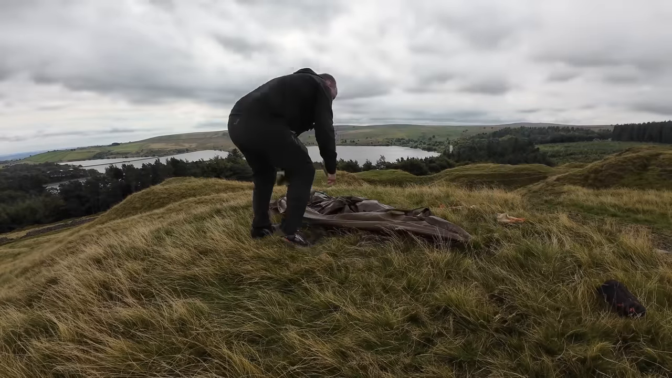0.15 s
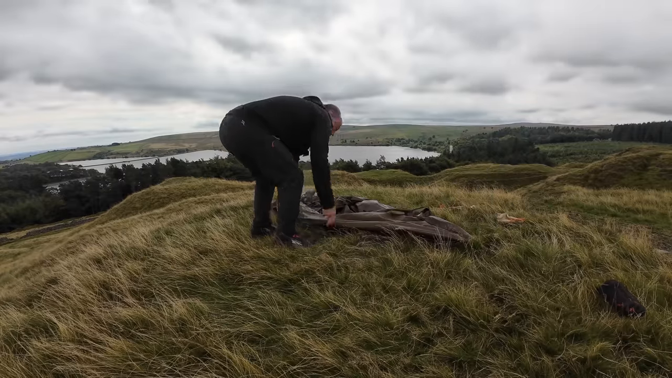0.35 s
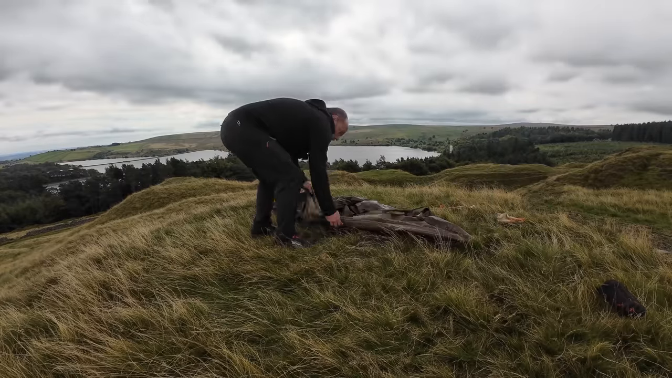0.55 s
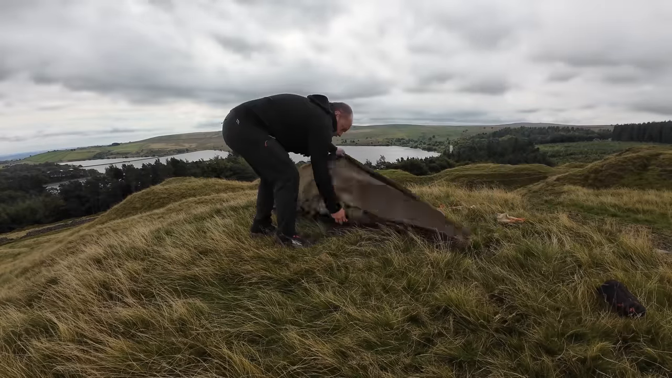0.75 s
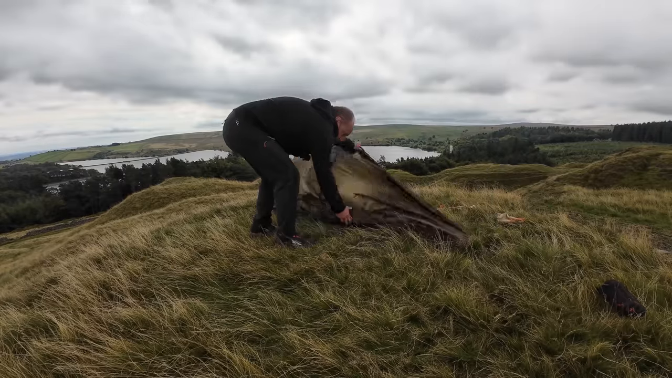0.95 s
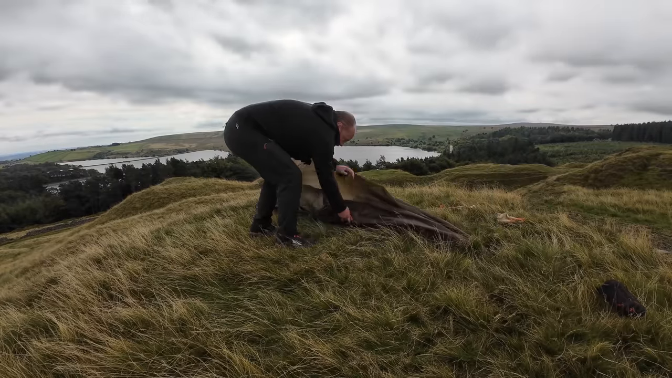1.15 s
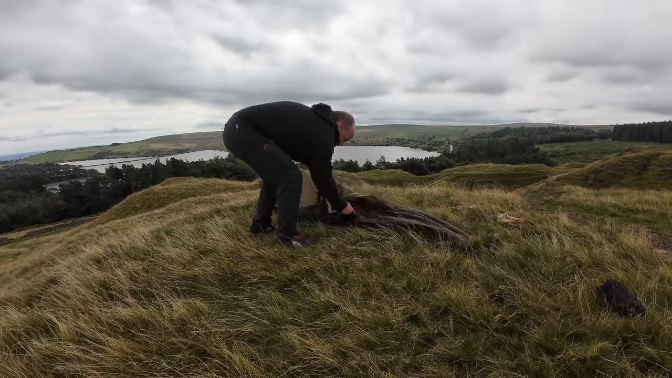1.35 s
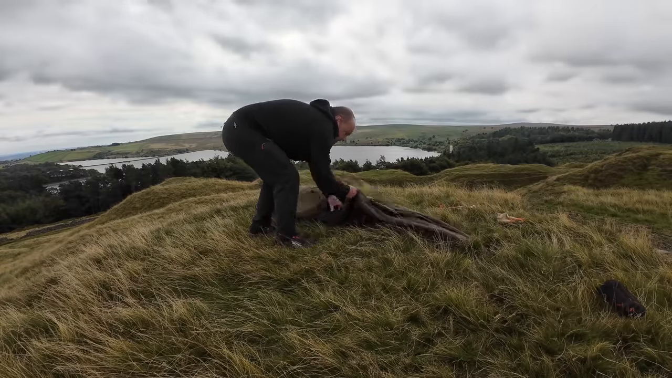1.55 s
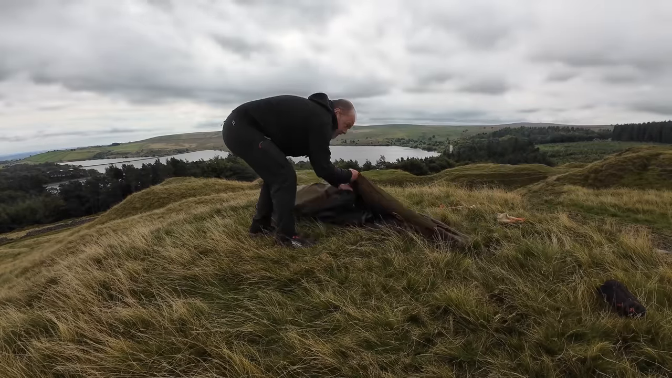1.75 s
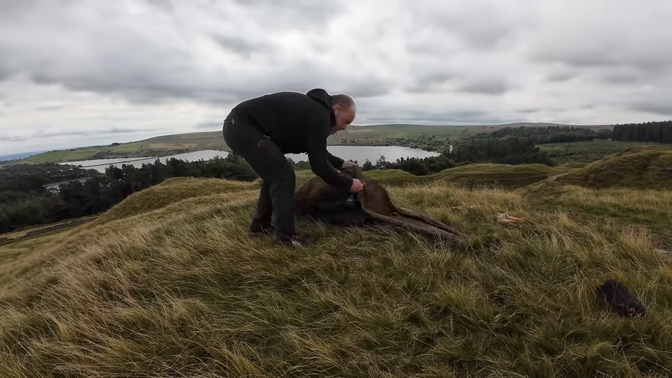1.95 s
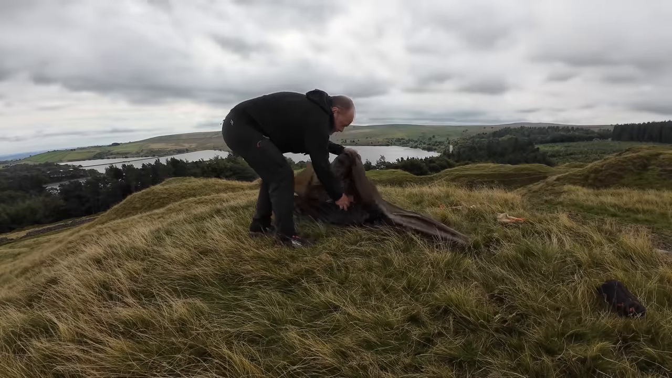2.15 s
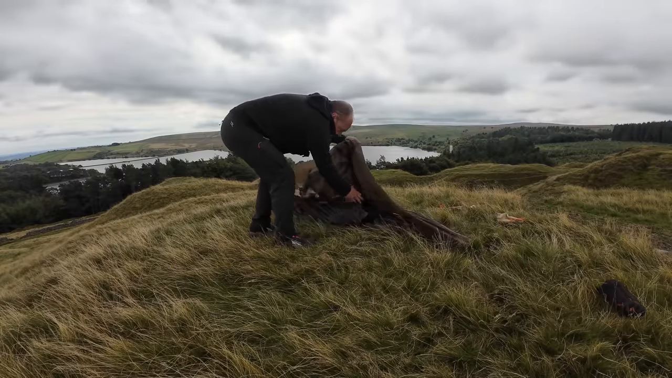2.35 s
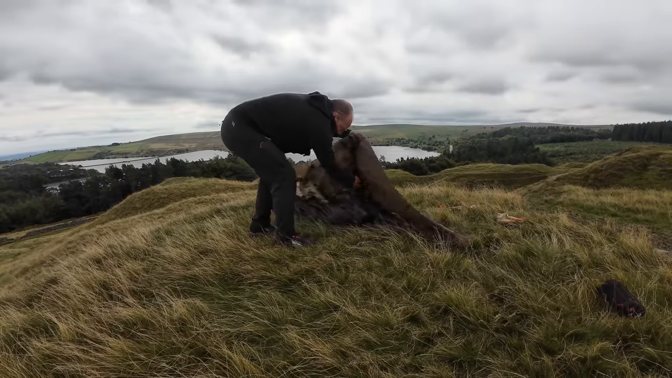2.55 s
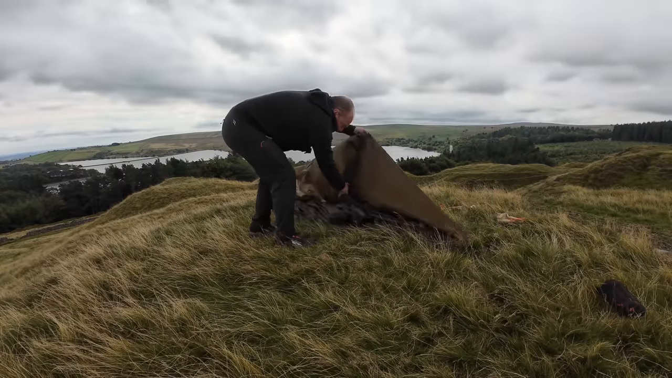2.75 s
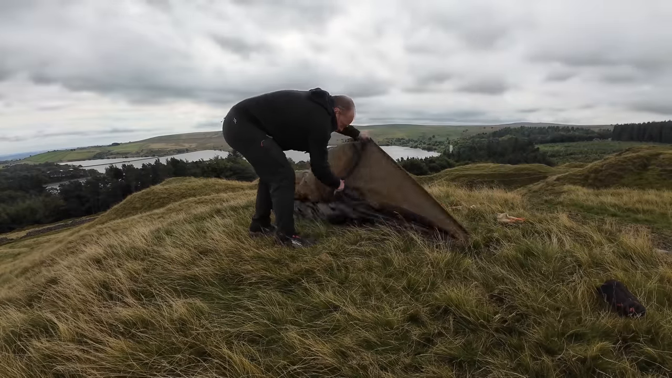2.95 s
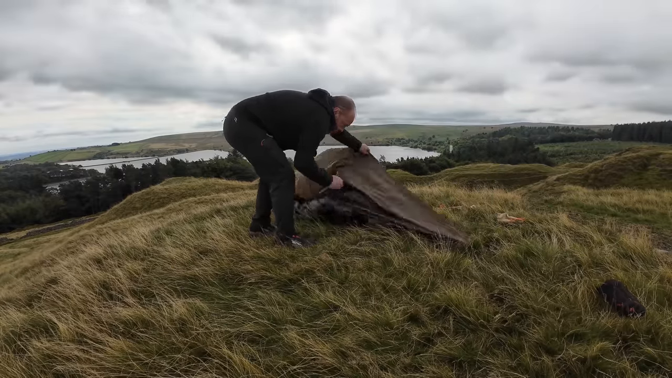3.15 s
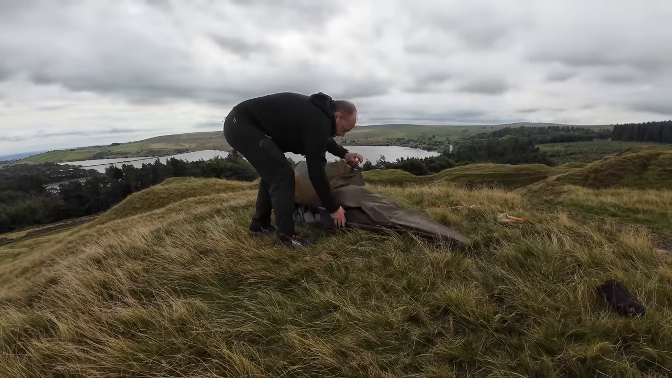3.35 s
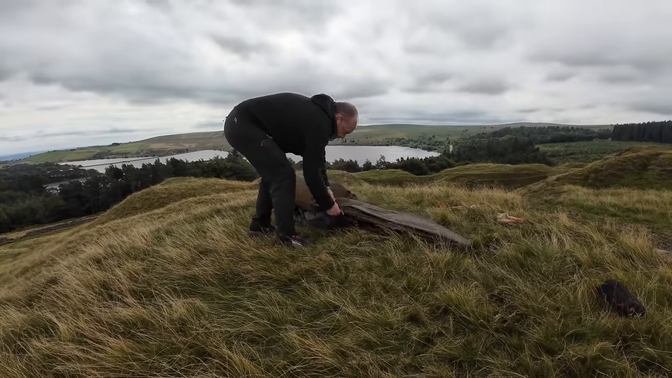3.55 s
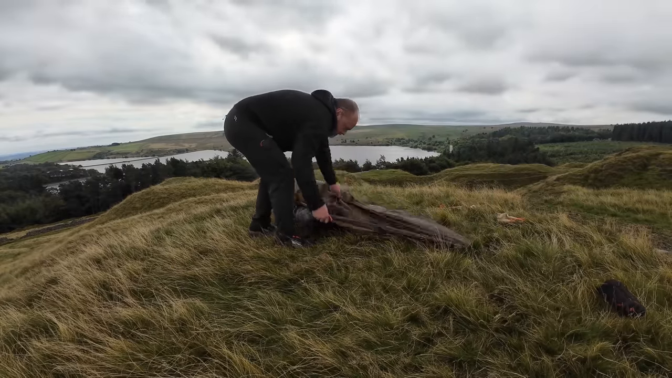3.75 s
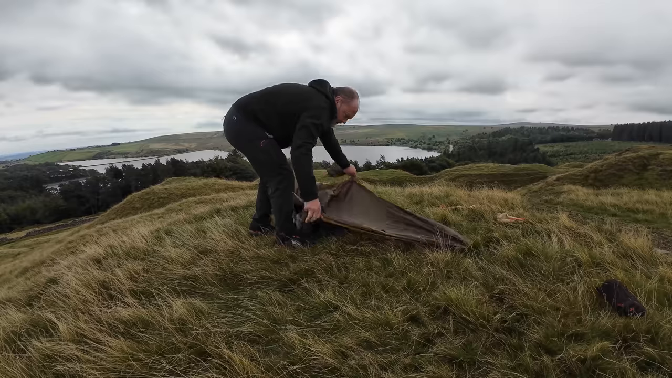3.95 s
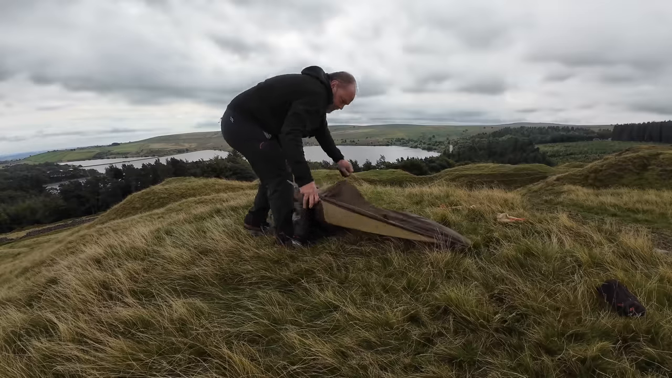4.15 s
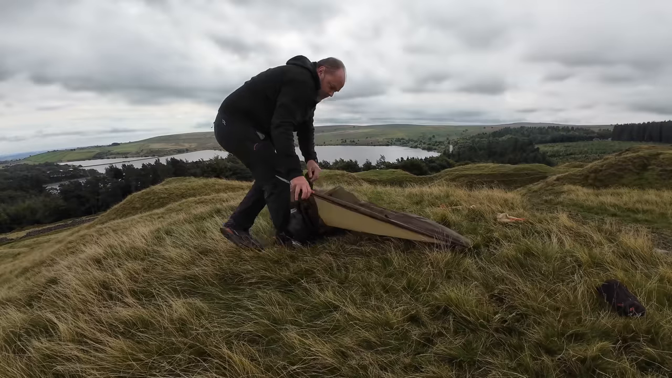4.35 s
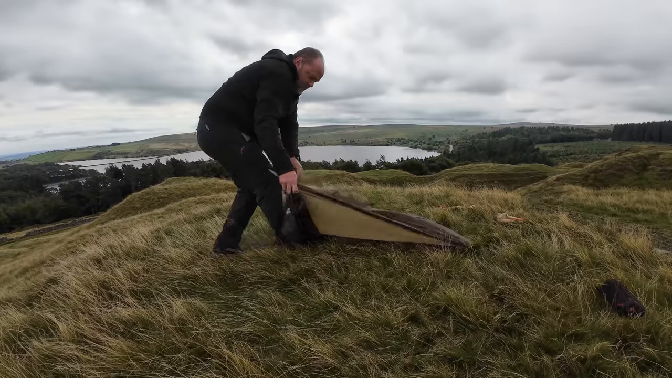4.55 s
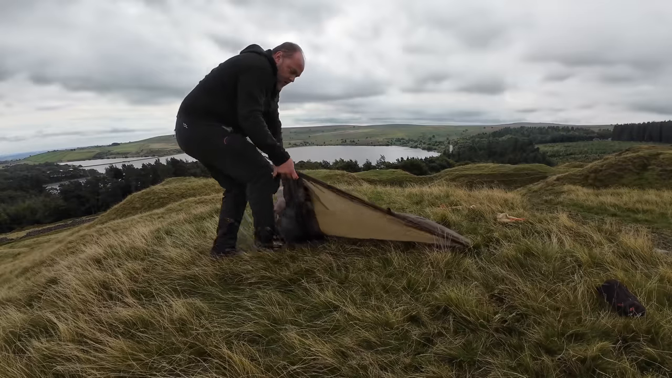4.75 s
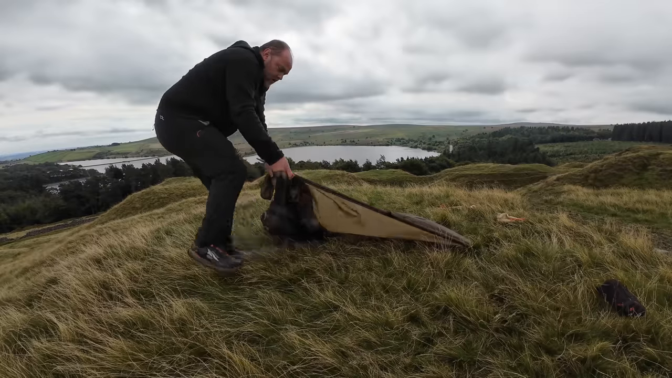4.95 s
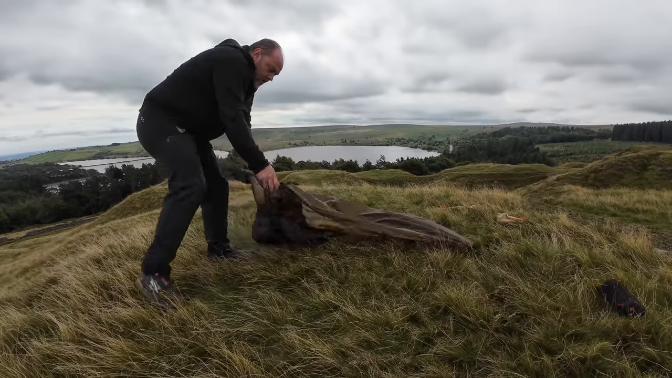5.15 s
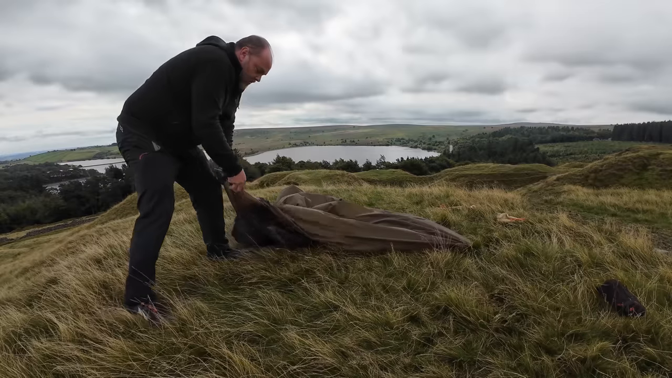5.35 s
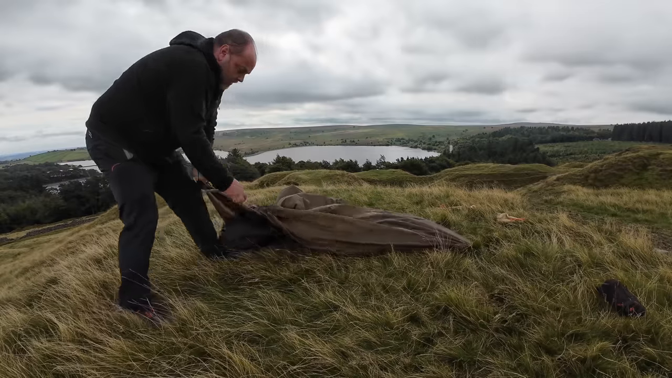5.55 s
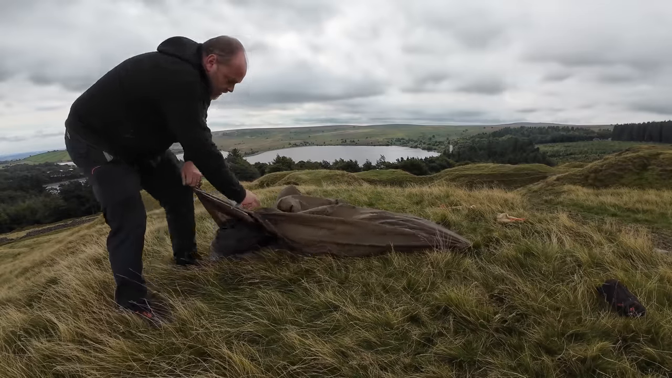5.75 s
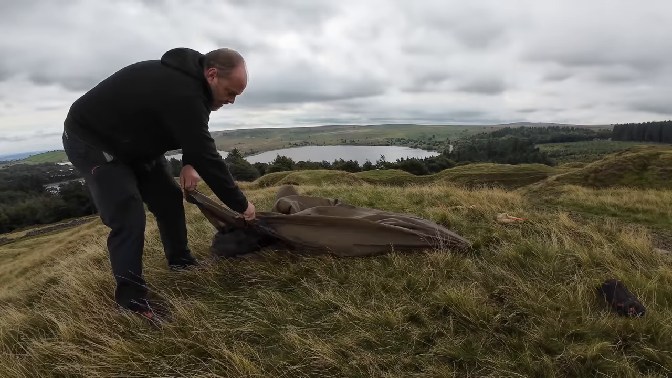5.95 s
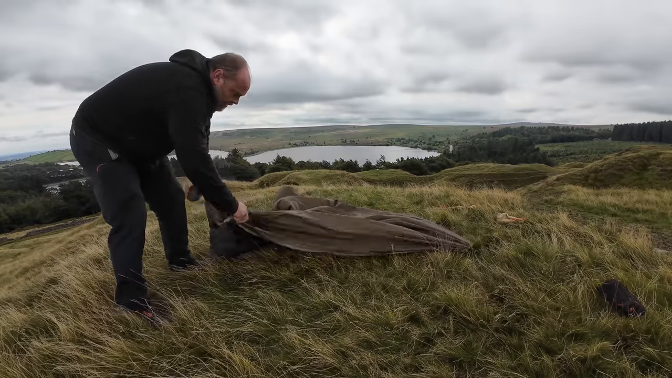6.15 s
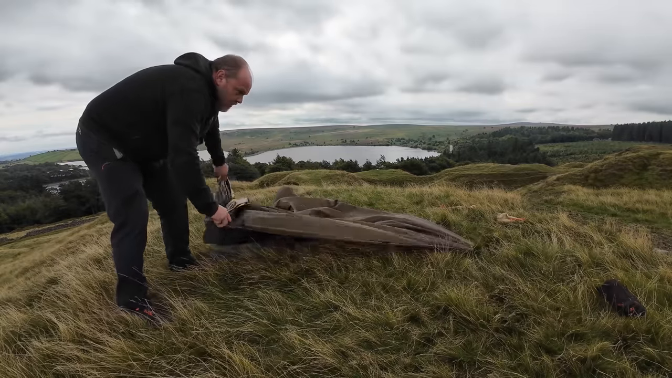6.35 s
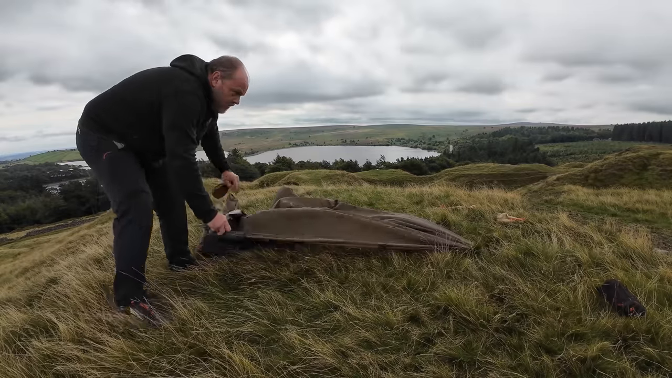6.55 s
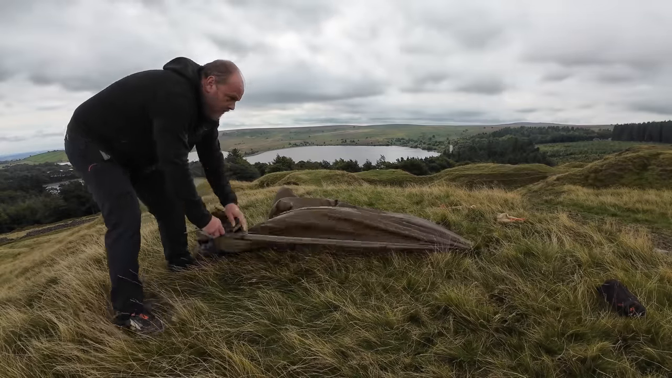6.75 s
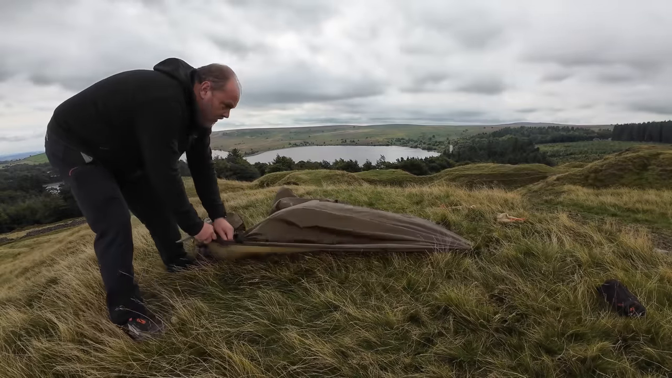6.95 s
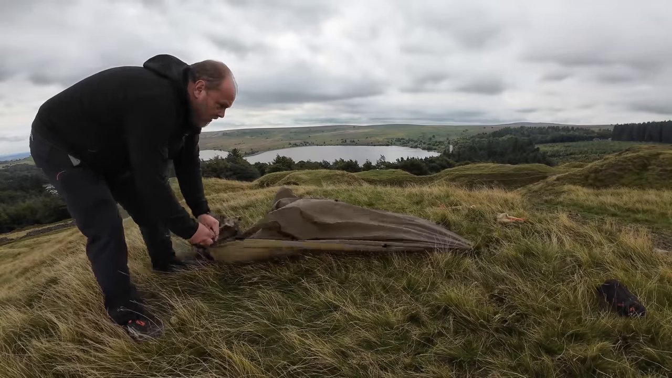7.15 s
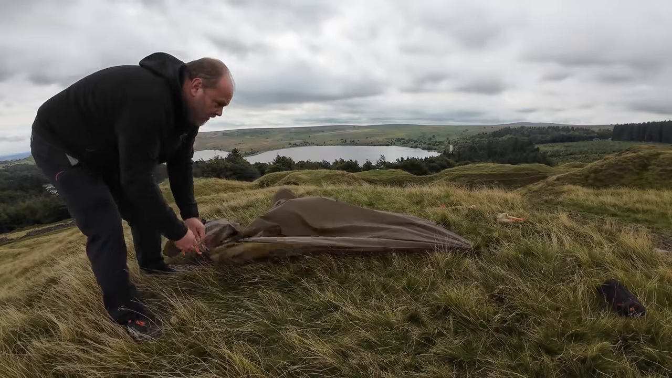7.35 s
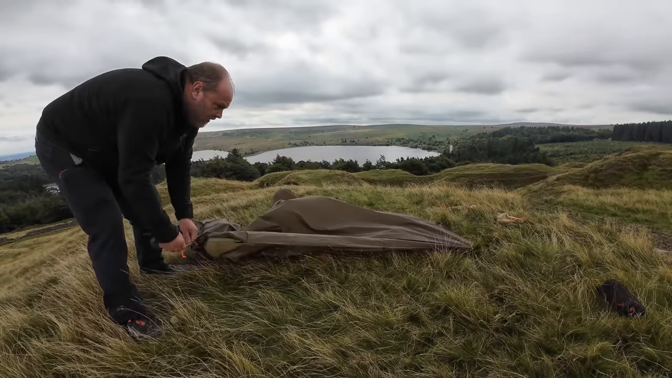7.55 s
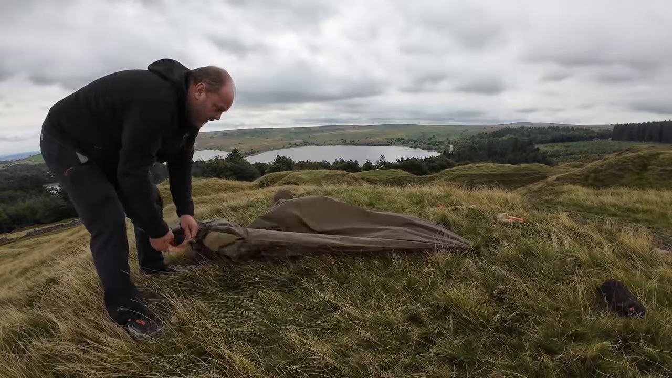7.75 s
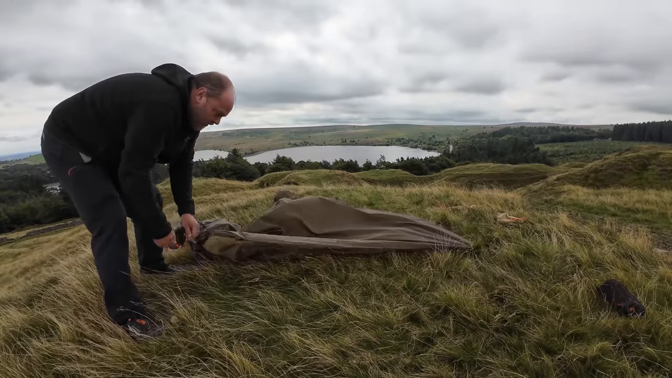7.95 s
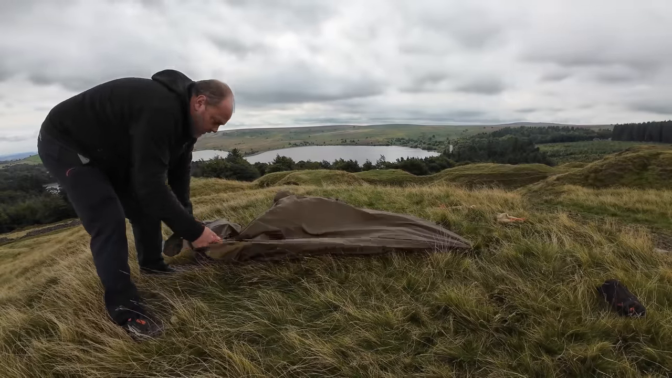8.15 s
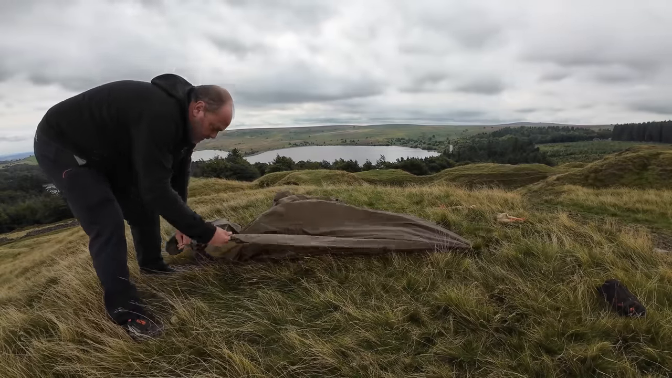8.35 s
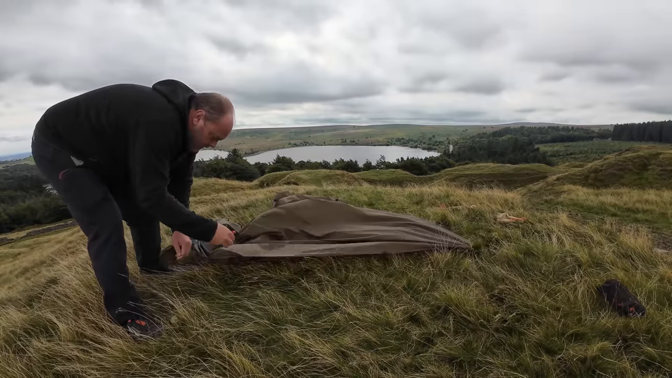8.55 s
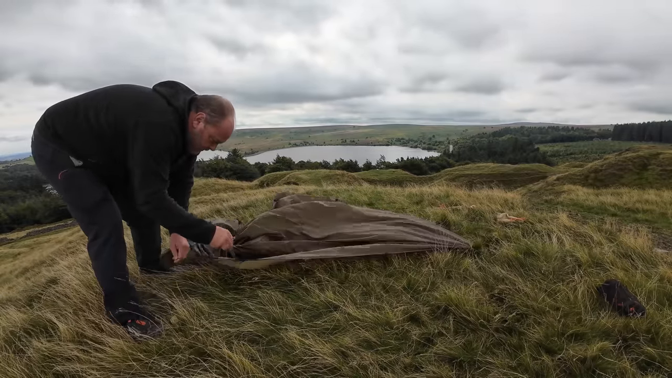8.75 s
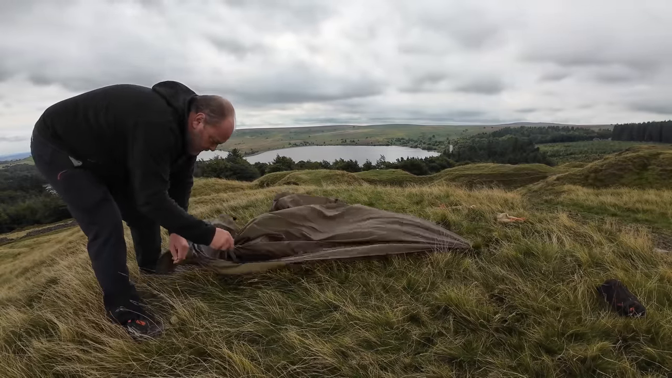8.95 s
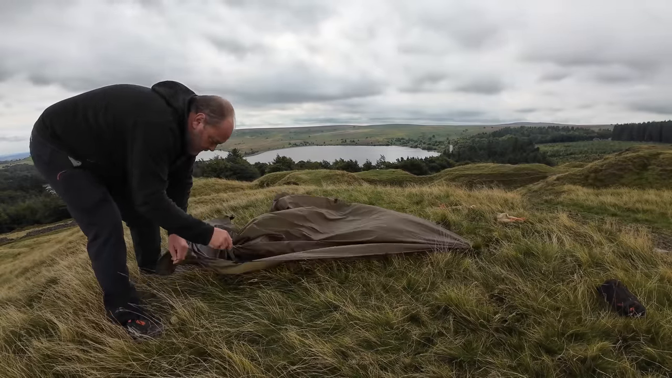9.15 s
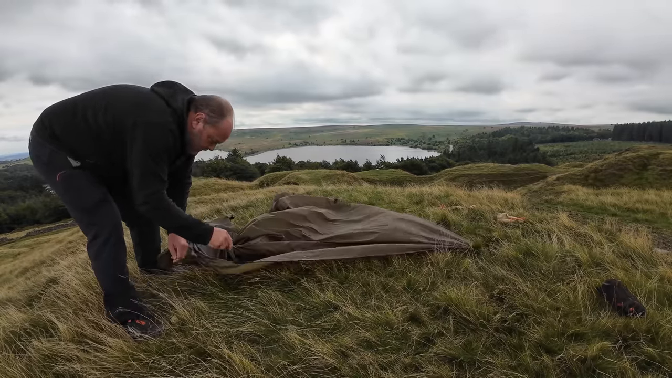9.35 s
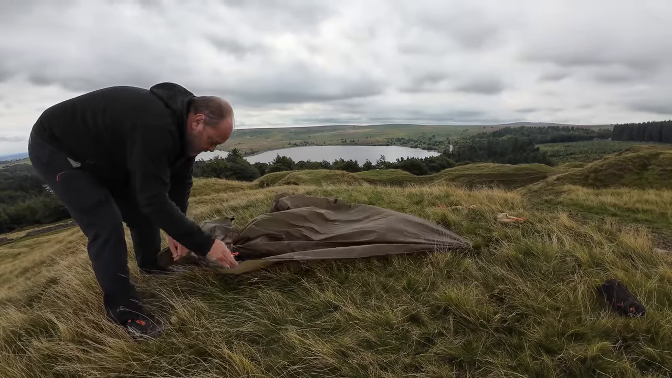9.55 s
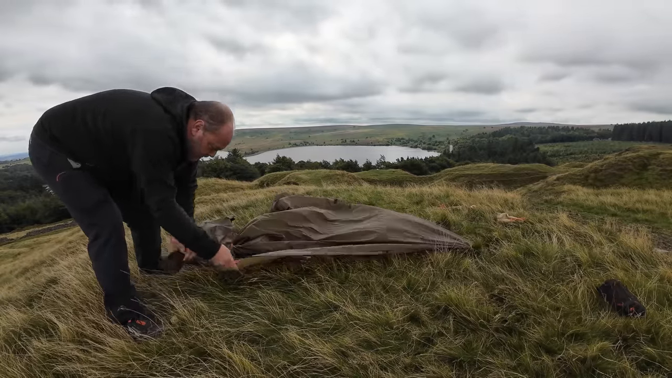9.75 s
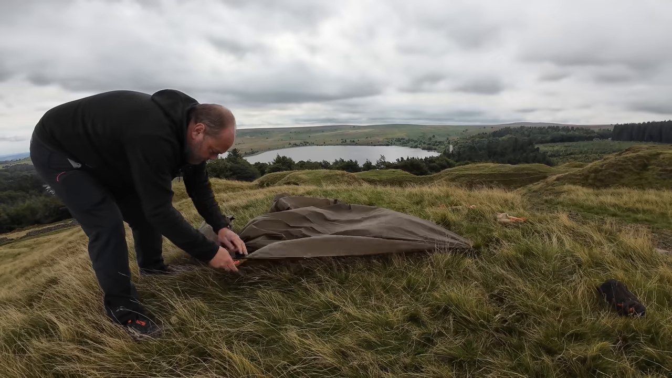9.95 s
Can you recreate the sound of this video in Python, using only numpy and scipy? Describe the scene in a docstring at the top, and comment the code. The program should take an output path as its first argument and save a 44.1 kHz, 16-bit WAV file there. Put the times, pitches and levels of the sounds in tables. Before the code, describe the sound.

A stiff nylon tarp is lifted, shaken out and dragged over long grass, rasping and crinkling with sharp crease pops and a few taut snaps. The handling is loudest in the first four seconds, swells once more, then fades to faint stirring. Near the end, metal pegs clink in a hand in two short clusters. Light gusts rumble unevenly on the microphone throughout, in dry open air.

```python
"""A stiff nylon tarp rustles as it is lifted, shaken out and dragged over long grass on a breezy hill.
The sliding weave rasps, wrinkles buckle in tiny ticks, large creases pop and panels snap taut.
Light gusts rumble on the microphone throughout.
Near the end metal pegs touch and ring in the hand, damped by the grip."""
import sys
import numpy as np
from scipy import signal
from scipy.io import wavfile

SR = 44100
rng = np.random.default_rng(int(sys.argv[2]) if len(sys.argv) > 2 else 0)


def unload_wav(signal):
    """Save mono or channel-first audio to the path in sys.argv[1] as 16-bit WAV at rate SR, clipped to [-1, 1]."""
    wavfile.write(
        sys.argv[1],
        SR,
        np.round(np.clip(np.atleast_2d(signal).T, -1, 1) * 32767).astype(np.int16),
    )


N = 441000
TIME = np.arange(N) / SR
BILLOW_HZ, RASP_LOW_HZ, RASP_HIGH_HZ, HISS_HZ = 550, 1500, 3580, 6800   # cloth crossfade corners


def from_db(db):
    """Decibels to gain."""
    return 10 ** (np.asarray(db) / 20)


def rms_one(x):
    """Scale to unit rms."""
    return x / np.sqrt(np.mean(x ** 2) + 1e-20)


def peak_one(x):
    """Scale to unit peak."""
    return x / np.abs(x).max()


def in_time(rows):
    """Interpolate (seconds, values..) rows to every sample."""
    times_s, *columns = np.transpose(rows)
    return [np.interp(TIME, np.sort(times_s), column) for column in columns]


def at_hz(points, hz):
    """Read a spectrum on a log-frequency axis."""
    points_hz, values = np.transpose(points)
    return np.interp(np.log(hz), np.log(points_hz), values)


def drift(rate_hz):
    """Unit-rms random wander, low-passed at rate_hz."""
    hop, warmup = 40, 2000
    pole = np.exp(-2 * np.pi * rate_hz * hop / SR)
    white = rng.standard_normal(N // hop + warmup + 2)
    slow = signal.lfilter([1], [1, -2 * pole, pole * pole], white)[warmup:]
    return np.interp(np.arange(N) / hop, np.arange(len(slow)), rms_one(slow))


def band(x, low_hz, high_hz):
    """Butterworth band-pass."""
    top_hz = min(high_hz, .48 * SR)
    edges_hz = [min(low_hz, top_hz / 2 ** (1 / 8)), top_hz]
    return signal.sosfilt(signal.butter(2, edges_hz, "band", fs=SR, output="sos"), x)


def ring(x, hz, t60_s):
    """One mode: a click in, a decaying sine out."""
    radius, angle = np.exp(-np.log(1000) / (t60_s * SR)), 2 * np.pi * hz / SR
    return signal.lfilter([0, np.sin(angle)], [1, -2 * radius * np.cos(angle), radius ** 2], x + 1e-18)


def add(out, start_s, sound):
    """Mix a short sound in at start_s."""
    start = int(start_s * SR)
    out[start:start + len(sound)] += sound[:N - start]


def noise_bands(low_hz, high_hz, count):
    """Adjacent noise bands, neighbours uncorrelated: (centre in Hz, signal) pairs."""
    edges_hz = np.geomspace(low_hz, high_hz, count + 1)
    white = rng.standard_normal((2, N))
    return [(np.sqrt(low * high), band(white[k % 2], low, high))
            for k, (low, high) in enumerate(zip(edges_hz, edges_hz[1:]))]


def pulling(stir_hiss_db=-4, release_db=-20, lead_share=0.62):
    """Strokes add in power to slack cloth stirring on grass. Returns billow, rasp, hiss in dB."""
    # Slack cloth. Each row: time in seconds, rasp in dB, billow in dB over the rasp.
    stirring = [(0, -77, 1), (.26, -77, 5), (.6, -59.5, 2), (2.1, -60, -3), (4.5, -61, -3.5),
                (5.3, -60.5, -2.5), (5.7, -66, 0.5), (6.55, -61.5, -3.5), (7.31, -68.5, 0.5),
                (7.41, -80, 1.5), (8.3, -77.5, 2), (9.05, -75.5, 2), (9.7, -79.5, 6.5)]
    # Pulls, shakes and drags. Each row: start, attack, hold and release in seconds, rasp in dB,
    # billow and hiss in dB over the rasp.
    strokes = [(0.017, 0.089, 0.039, .11, -58.5, -1, -4), (0.32, .095, .04, .2, -49, -8, -3),
               (0.355, .005, .11, .22, -49, -2, -7), (0.531, .1, .24, .11, -39.5, -2, -5),
               (0.86, .01, .025, .06, -42, 1, -9), (0.92, .03, 0.2, .35, -51.5, -2, -7.5),
               (1.1, 0.02, 0.038, .15, -53, -2, 4.5), (1.326, 0.044, 0.024, .2, -42, -3, -2.5),
               (1.446, 0.017, 0.028, .15, -48, -6, 2), (1.562, 0.016, 0.034, .15, -49, -6.5, 3.5),
               (1.623, 0.045, 0.28, .2, -54, -5, 2), (1.92, 0.032, 0.039, .08, -47.5, -5, 5),
               (2.215, 0.26, .1, .3, -54, -6, -3), (2.478, 0.037, 0.12, .15, -53, -6, 2),
               (2.606, 0.033, 0.052, .1, -45.5, -9, -0.5), (2.721, .015, 0.0075, .07, -42.5, -12, 2),
               (2.824, 0.021, 0.18, .2, -50.5, -7, -4), (2.969, 0.069, 0.024, .14, -40.5, -6, -2),
               (3.245, 0.069, 0.13, .2, -53.5, -8, -5), (3.503, 0.088, 0.084, .3, -43, -4, -2),
               (3.676, 0.059, .13, .18, -39, -1, 0), (4.033, 0.053, 0.27, .3, -60, -3.5, -1.5),
               (4.724, 0.044, 0.046, .12, -57.5, -3, -4), (4.92, 0.052, 0.095, .3, -54, -5.5, -2),
               (5.337, 0.14, 0.099, .06, -59.5, -4.5, -2), (5.776, 0.035, 0.028, .08, -59.5, -0.5, -6.5),
               (5.906, 0.014, 0.1, .1, -56.5, -4, -2), (6.028, 0.093, 0.1, .1, -41.5, -8, 0),
               (6.343, 0.056, 0.033, .15, -56.5, -3.5, -9), (6.887, .014, 0.015, .08, -60.5, 1.5, 2),
               (7.543, 0.03, .03, .08, -69.5, 4, 0), (7.819, 0.037, .09, .1, -72, 5, -2),
               (8.224, 0.019, .015, .06, -70, 0.5, -10), (8.586, 0.026, .03, .12, -73.5, 3, -8),
               (8.766, 0.057, 0.025, .06, -65.5, -4, -7), (9.32, 0.15, .05, .15, -75.5, 5.5, -4),
               (9.71, 0.081, 0.056, .2, -73, 7, -3), (9.915, 0.037, 0.037, .1, -64, -1, -3)]
    stir_db, stir_billow_db = in_time(stirring)
    power = from_db([stir_db + stir_billow_db, stir_db, stir_db + stir_hiss_db]) ** 2
    for start_s, attack_s, hold_s, release_s, rasp_db, billow_db, hiss_db in strokes:
        lead_in_s = max(start_s - attack_s, 0)
        span_s = 2 * attack_s + hold_s + 2 * release_s
        since_crest_s = TIME[:int(span_s * SR)] + lead_in_s - start_s - attack_s
        swell = np.exp(-(np.minimum(since_crest_s, 0) / (lead_share * attack_s)) ** 2)
        fade = from_db(release_db * np.maximum(since_crest_s - hold_s, 0) / release_s)
        for part, part_db in zip(power, (billow_db, 0, hiss_db)):
            add(part, lead_in_s, (from_db(rasp_db + part_db) * swell * fade) ** 2)
    return 10 * np.log10(power)


def faltering(levels_db, common_db=1.0, own_db=.6, rate_hz=14):
    """The cloth sticks and gives, as a whole and in its parts."""
    together_db = common_db * drift(rate_hz)
    return [part_db + together_db + own_db * drift(rate_hz) for part_db in levels_db]


def cloth_db(levels_db, hz):
    """Cloth level at one frequency: billow in the bass, fold rasp in the middle, weave hiss on top."""
    # Cloth colour. Each row: frequency in Hz, relative spectral density in dB.
    colour = [(130, -4), (220, 2), (320, 2.5), (480, 1), (660, -5), (880, -8.5), (1150, -7.5), (1480, -9.5),
              (2000, -5.5), (3300, -6.5), (4700, -11.5), (6800, -9.5), (11000, -13), (15000, -13)]
    billow_db, rasp_db, hiss_db = levels_db
    low = at_hz([(BILLOW_HZ, 1), (RASP_LOW_HZ, 0)], hz)
    high = at_hz([(RASP_HIGH_HZ, 0), (HISS_HZ, 1)], hz)
    return low * billow_db + (1 - low - high) * rasp_db + high * hiss_db + at_hz(colour, hz)


def sliding(levels_db, gain_db=14.0, catch_db=1.46, catch_hz=55, patchy_db=1.74, patchy_hz=7):
    """The weave rubs on itself and on grass, catching in all bands at once; shifting folds recolour it."""
    # Resonant pocket between folds. Each row: time in seconds, centre in Hz, strength in dB.
    pocket = [(0.1, 2600, -9), (0.38, 2360, 8), (0.7, 2250, 0.5), (1.33, 2100, 5.5), (1.48, 2900, -2.5),
              (1.62, 3780, 8.5), (1.97, 3870, 13), (2.15, 3300, -2), (2.93, 2500, -.5), (3.06, 2700, 10),
              (3.25, 2670, -1), (3.6, 3130, 5.5), (3.85, 3080, 3), (4.7, 3650, 5.5), (6.15, 2880, 5),
              (6.7, 2706, 0), (9.9, 2703, -1)]
    pocket_hz, pocket_db = in_time(pocket)
    width_octaves = 0.335 * from_db(-0.74 * pocket_db)   # stronger is narrower
    catching_db = catch_db * drift(catch_hz)
    out = 0
    for hz, noise in noise_bands(150, 17000, count=44):
        band_db = cloth_db(levels_db, hz) + catching_db + patchy_db * drift(patchy_hz)
        if RASP_LOW_HZ / 2 < hz < HISS_HZ:
            offset = np.log2(hz / pocket_hz) / width_octaves
            peak = np.exp(-offset ** 2 / 2)
            broad_dip = 0.285 * np.exp(-offset ** 2 / 50)
            band_db = band_db + pocket_db * (peak - broad_dip)
        out = out + noise * from_db(band_db)
    return from_db(gain_db) * out


def crinkling(levels_db, gain_db=7.5, per_s=640, size_db=4.0, clump_db=3.0, colour_db=6.0, decay_s=0.00056):
    """Tiny wrinkles buckle in clumps, a few large and many small, each with its own colour."""
    chance = per_s * from_db(clump_db * drift(rate_hz=18)) / SR
    onsets = np.flatnonzero(rng.random(N) < chance)
    sizes = from_db(size_db * np.minimum(rng.exponential(1, len(onsets)), 3.4))
    out = 0
    for hz, noise in noise_bands(250, 17000, count=12):
        buckles = np.full(N, 1e-18)
        buckles[onsets] = sizes * from_db(colour_db * rng.standard_normal(len(onsets)))
        bursts = rms_one(signal.lfilter([1], [1, -np.exp(-1 / (decay_s * SR))], buckles))
        out = out + noise * bursts * from_db(cloth_db(levels_db, hz))
    return from_db(gain_db) * out


def airflow(billow_db, breeze_db=-79, draught_db=-68, follow_share=.6):
    """Wind amplitude: steady breeze, the cloth's draught and bell-shaped gusts add in power."""
    # Gusts. Each row: crest time in seconds, level in dB, half length in seconds.
    gusts = [(0.11, -62, .06), (0.45, -57, .08), (0.72, -51.5, 0.18), (0.884, -39.5, 0.033),
             (1.03, -45, 0.14), (1.514, -46.5, 0.23), (1.99, -57, .06), (2.46, -50.5, .13),
             (2.7, -53, 0.13), (2.951, -46, .055), (3.05, -52, .06), (3.58, -56, .06), (3.87, -54, .08),
             (4.12, -64, .12), (5.06, -54.5, 0.12), (5.212, -53, 0.037), (5.468, -57.5, 0.057),
             (5.84, -57, 0.057), (6.102, -51, 0.074), (6.937, -61, .04), (7.606, -61, 0.07),
             (7.9, -44.5, 0.042), (8.72, -67, .08), (9.25, -60.5, 0.16), (9.51, -52.5, 0.099),
             (9.812, -46, 0.062), (9.975, -47, .05)]
    draught = from_db(draught_db + follow_share * (billow_db - billow_db.mean()))
    power = from_db(breeze_db) ** 2 + draught ** 2
    for crest_s, level_db, half_s in gusts:
        bell = np.exp(-np.minimum(((TIME - crest_s) / half_s) ** 2, 20))
        power = power + (from_db(level_db) * bell) ** 2
    return np.sqrt(power)


def wind(billow_db, gain_db=-0.45, lump_db=1.5, lump_hz=18):
    """Eddies buffet the microphone port in low, uneven lumps."""
    # Rumble at the port. Each row: frequency in Hz, relative spectral density in dB.
    spectrum = [(25, -33), (42, -20), (65, -8), (95, 0.5), (130, 1), (175, -6), (260, -20.5), (400, -30.5)]
    rumble = sum(noise * from_db(at_hz(spectrum, hz)) for hz, noise in noise_bands(22, 450, count=10))
    lumps = from_db(lump_db * drift(lump_hz))
    return from_db(gain_db) * airflow(billow_db) * rms_one(rumble * lumps)


def creases(body_gain_db=-2.2, edge_gain_db=3, pop_s=.0008, settle_s=0.0035, settle_db=-14, spread=1.32):
    """A large crease flips with a sharp tick, and the cloth around it settles."""
    # Each row: start in seconds, body level in dB, pitch in Hz, treble edge level in dB.
    pops = [(0.4975, -29, 2640, -52), (0.5904, -21.5, 2280, -42), (0.6484, -21, 2890, -34.5),
            (0.678, -16.5, 3250, -26), (1.059, -26.5, 2400, -52), (1.1748, -27.5, 2540, -48.5),
            (1.3622, -21, 2030, -43), (1.5864, -22.5, 5500, -38), (1.6126, -31, 3570, -42),
            (1.805, -26.5, 3050, -50), (1.952, -25.5, 3600, -39), (1.9907, -25, 3600, -40.5),
            (2.143, -38, 3170, -45), (2.1624, -46, 2200, -37), (2.5144, -31.5, 3340, -34),
            (2.5782, -33, 5200, -27.5), (2.6739, -30, 3110, -38), (2.7355, -27, 4040, -28),
            (3.0265, -22, 2760, -39.5), (3.0468, -15.5, 2600, -38), (4.1037, -34, 2993, -66),
            (4.78, -39, 2910, -58), (5.0136, -33, 2850, -56), (5.552, -39, 3410, -40),
            (6.0634, -25.5, 2820, -47.5), (6.9043, -40, 4080, -57)]
    out, t = np.zeros(N), TIME[:SR // 25]
    envelope = np.exp(-t / pop_s) + from_db(settle_db) * np.exp(-t / settle_s)
    for start_s, body_db, hz, edge_db in pops:
        burst = rng.standard_normal(len(t)) * envelope
        body = from_db(body_db + body_gain_db) * peak_one(band(burst, hz / spread, hz * spread))
        edge = from_db(edge_db + edge_gain_db) * peak_one(band(burst, 7000, 16000))
        add(out, start_s, body + edge)
    return out


def snaps(gain_db=-1, rise_cycles=0.28, t60_cycles=4.32, crack_db=-15, crack_s=0.0029):
    """A panel jerks taut and pushes out a heavily damped air pulse with a crack on its front."""
    # Each row: start in seconds, level in dB, pitch in Hz.
    panels = [(0.7055, -20, 407), (0.7065, -19, 1165), (0.737, -22.5, 419), (0.8635, -16, 203),
              (0.8655, -10.5, 2120), (0.874, -30, 132), (3.0478, -18.5, 2570), (3.733, -29, 402),
              (3.794, -28, 430), (3.810, -23.5, 430), (3.846, -27, 304), (3.857, -20.5, 304),
              (6.146, -31, 298), (6.225, -14, 350), (6.226, -19, 1150), (6.413, -34.5, 204)]
    out, t = np.zeros(N), TIME[:SR // 20]
    for start_s, level_db, hz in panels:
        jerk = np.sin(np.pi * np.minimum(t * hz / rise_cycles, 1)) ** 2
        push = band(ring(jerk, hz, t60_cycles / hz), hz / 2, 8000)
        crack = band(rng.standard_normal(len(t)), 900, 5000) * np.exp(-t / crack_s)
        snap = peak_one(push) + from_db(crack_db) * peak_one(crack)
        add(out, start_s, from_db(level_db + gain_db) * snap)
    return out


def pegs(scrape_db=-7, knock_t60_s=0.00362, vary_db=2, mistune=0.0067, lowest_hz=2150):
    """Each touch is a short gritty scrape that rings the pegs; a tight fist cuts the ringing short."""
    # Each row: start in seconds, peak in dB, contact time in seconds, knock pitch in Hz,
    # knock level in dB over the ringing, looseness of grip from 0 to 1.
    touches = [(7.289, -43, 0.011, 8530, -7, 0.5), (7.339, -42.5, 0.0064, 10260, 4, 1),
               (7.425, -59, .0069, 3500, -1, .3), (7.497, -37, .003, 9000, -.5, .45),
               (7.501, -32, 0.0078, 9150, 10.5, 0.9), (7.544, -43, 0.0048, 13300, -5, .27),
               (7.564, -29, 0.0053, 13400, -3, 0.4), (7.5766, -25, 0.0022, 3930, -8.5, .2),
               (7.594, -41.5, 0.018, 7200, -10, .36), (8.118, -58, .006, 10000, -3, .2),
               (8.153, -55, .0054, 3060, 7, .27), (8.392, -42, 0.006, 5370, -2, .3),
               (8.399, -40.5, 0.013, 5500, 7, .08), (8.4211, -31.5, 0.0026, 5430, 8, 0.3),
               (8.431, -52.5, .0121, 4500, 10.5, 0.1)]
    # Each row: frequency in Hz, relative level in dB, t60 in seconds at the loosest grip.
    modes = [(2370, -1, .05), (3200, -17, 0.044), (3750, -2, 0.053), (5950, -14, 0.16), (7570, -2.5, 0.13),
             (8840, -2.5, 0.073), (9160, -2.5, 0.083), (10230, -0.5, 0.12), (11090, -2, .07),
             (12100, 0.5, 0.042), (13300, -6.5, .03), (13970, -12, 0.022)]
    out, t = np.zeros(N), TIME[:SR // 6]
    for start_s, peak_db, contact_s, knock_hz, knock_db, looseness in touches:
        pressure = t / contact_s * np.exp(-(t / contact_s) ** 2)
        grit = rng.standard_normal(len(t)) * np.sqrt(rng.exponential(1, len(t)))
        scrape = grit * pressure
        ringing = 0
        for hz, mode_db, t60_s in modes:
            peg_hz = hz * (1 + mistune * rng.standard_normal())   # no two pegs are alike
            mode = rms_one(ring(scrape, peg_hz, t60_s * looseness))
            ringing = ringing + mode * from_db(mode_db + vary_db * rng.standard_normal())
        knock = from_db(knock_db) * rms_one(ring(scrape, knock_hz, knock_t60_s))
        clink = rms_one(ringing) + knock + from_db(scrape_db) * rms_one(scrape)
        for _ in range(2):   # thin rods radiate no bass
            clink = band(clink, lowest_hz, SR / 2)
        add(out, start_s, from_db(peak_db) * peak_one(clink))
    return out


def scene():
    """Tarp, pegs and wind in open air: mono, dry."""
    levels_db = faltering(pulling())
    tarp = sliding(levels_db) + crinkling(levels_db) + creases() + snaps()
    return (tarp + pegs() + wind(billow_db=levels_db[0]))[None]


def record(dry):
    """A wind filter takes off the deep bass; the top is cut steeply."""
    low_cut_hz, high_cut_hz = 64.5, 15600
    thinned = signal.sosfilt(signal.butter(2, low_cut_hz, "high", fs=SR, output="sos"), dry)
    return signal.sosfilt(signal.ellip(10, .2, 80, high_cut_hz, fs=SR, output="sos"), thinned)


dry = scene()
out = record(dry)
unload_wav(out)
```